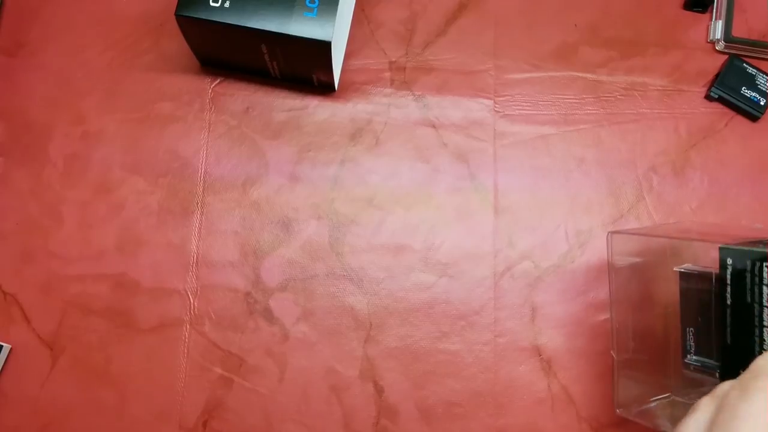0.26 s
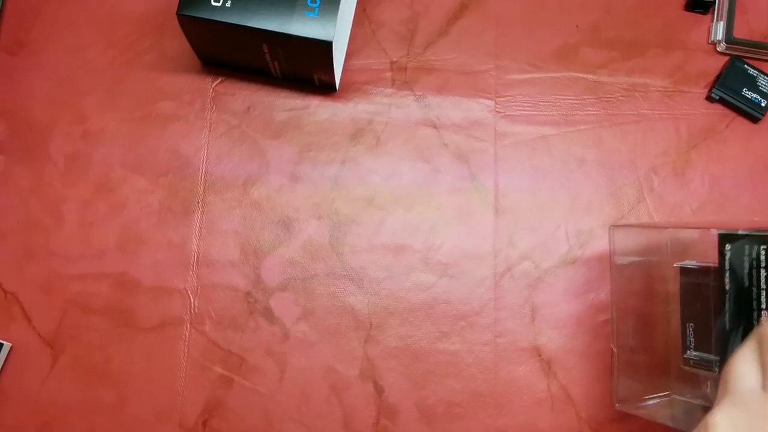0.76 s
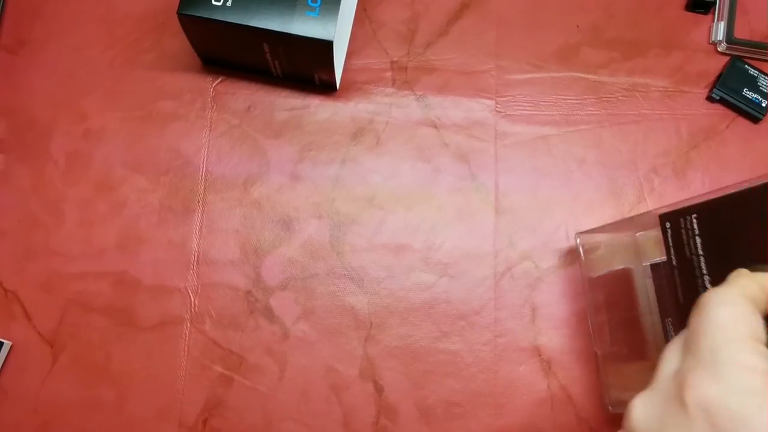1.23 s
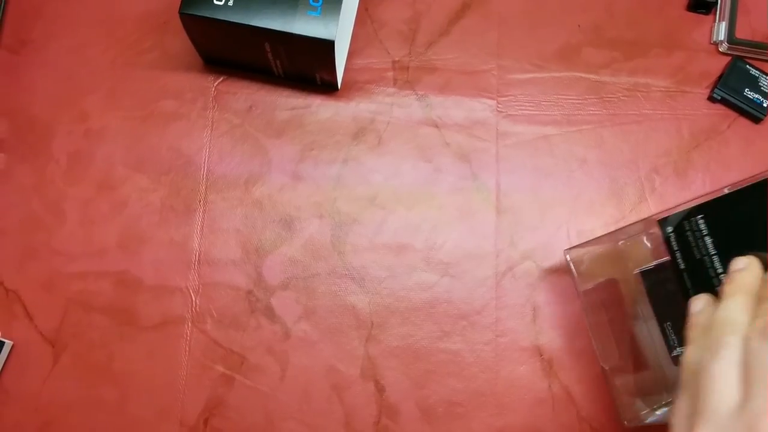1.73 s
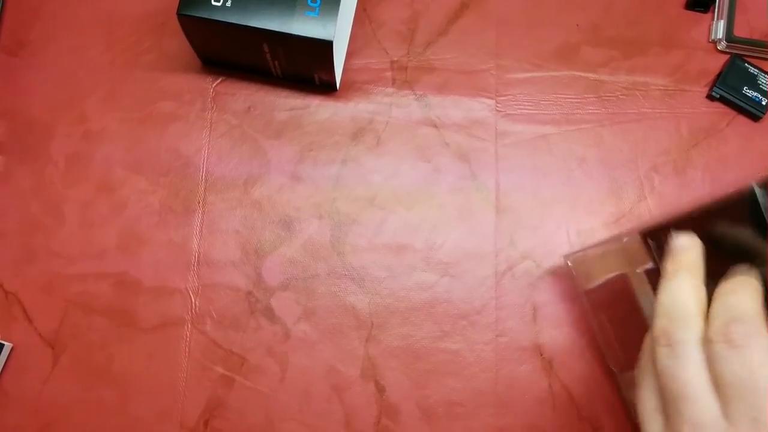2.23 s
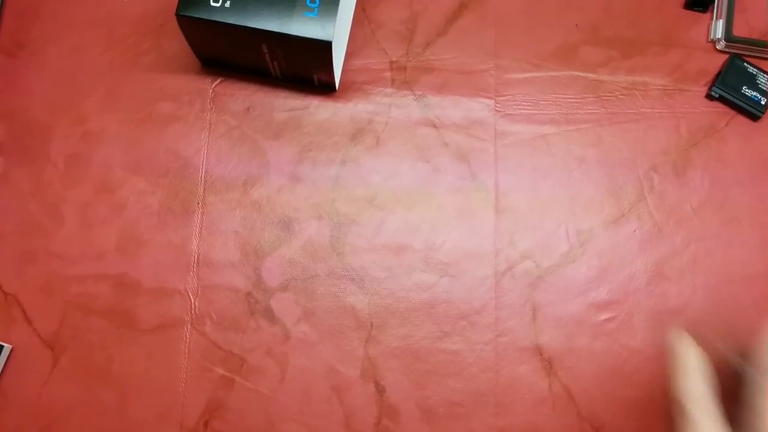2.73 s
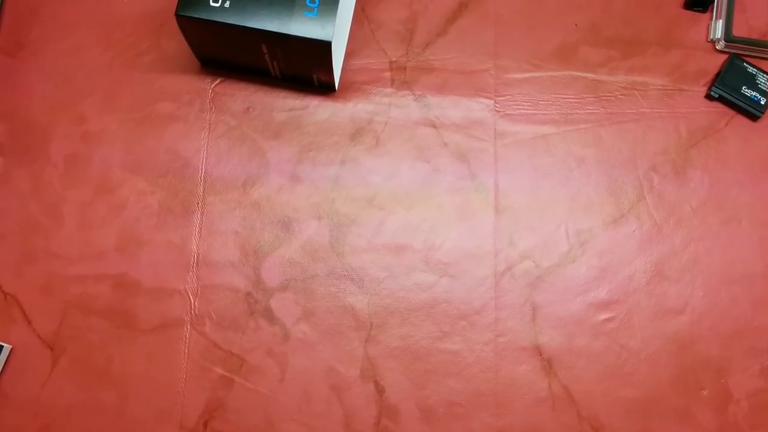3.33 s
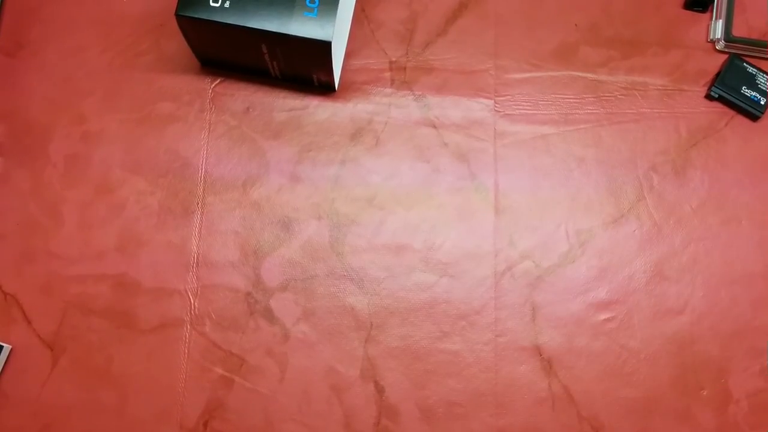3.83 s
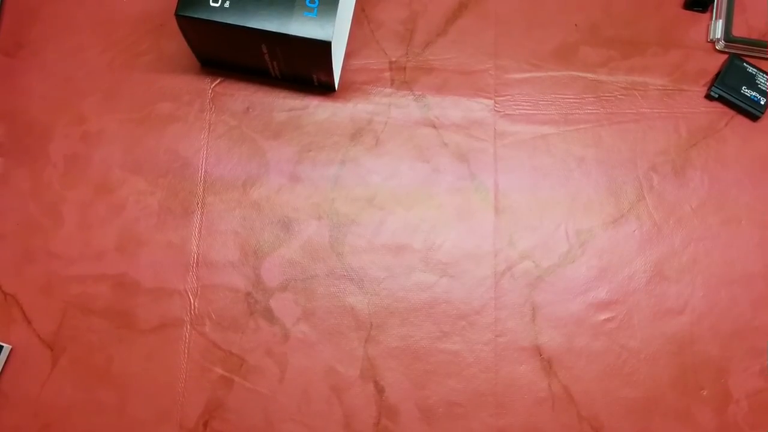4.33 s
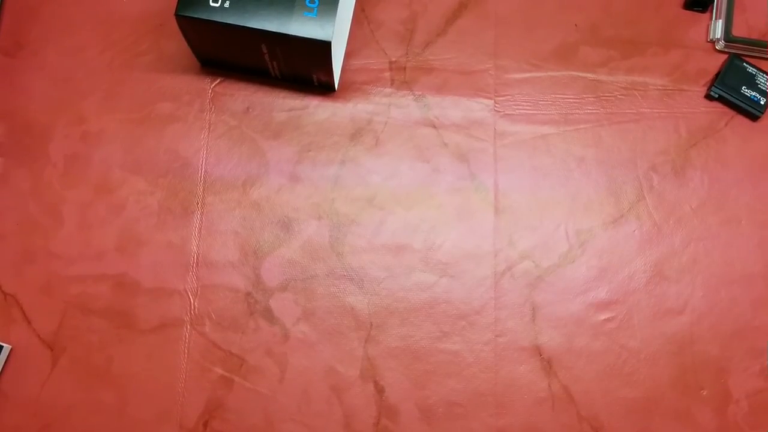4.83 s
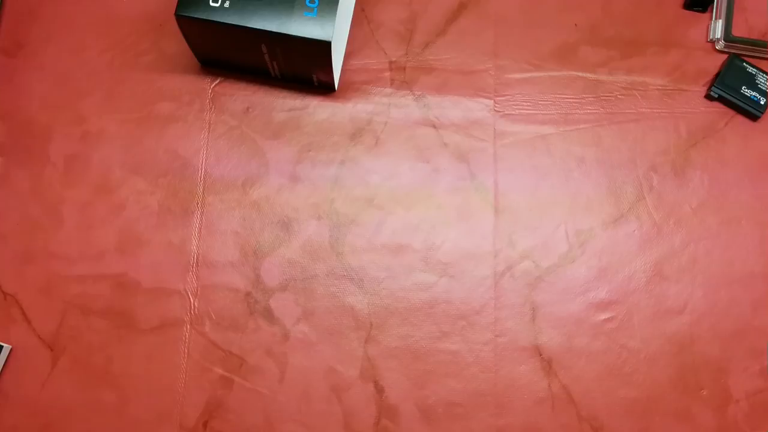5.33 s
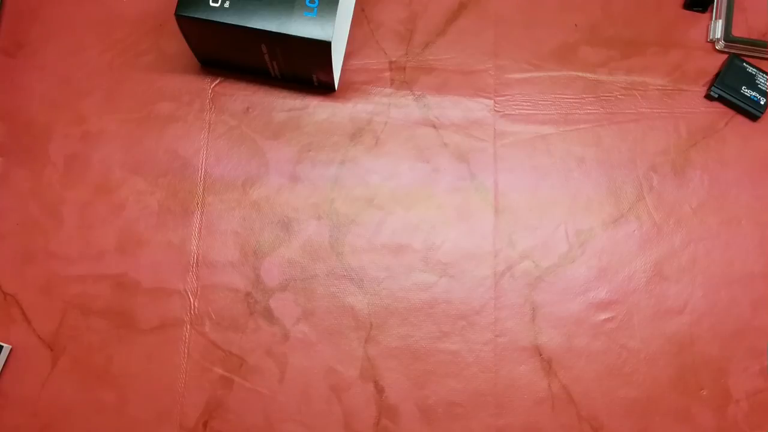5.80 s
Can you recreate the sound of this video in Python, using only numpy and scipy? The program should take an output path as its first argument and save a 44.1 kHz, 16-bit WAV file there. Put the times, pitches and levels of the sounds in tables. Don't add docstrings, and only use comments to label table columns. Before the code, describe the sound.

A stiff clear plastic box is handled on a table, a dull knock and small crackles building to a loud splintering snap, then scattered clicks and rustle.

```python
import sys
import numpy as np
from scipy import signal
from scipy.fft import rfft, irfft
from scipy.io import wavfile
from scipy.ndimage import uniform_filter1d

SR = 44100
rng = np.random.default_rng(int(sys.argv[2]) if len(sys.argv) > 2 else 0)


def put_to_file(sound):
    columns = np.atleast_2d(sound).T
    safe = np.clip(columns, -1, 1)
    whole_steps = np.round(safe * 32767)
    wavfile.write(sys.argv[1], SR, whole_steps.astype(np.int16))


def undo_db(level):
    steps = np.asarray(level, float) / 20
    return 10 ** steps


N = 267201

# (frequency [Hz], level [dB])
HISS_COLOUR = [(18, -14.5), (30, -4.5), (50, -13), (167, -16.5), (399, -11.5), (858, -12), (1210, -16),
               (1570, -17), (9000, -20.5), (15700, -28), (15950, -61.5)]
# (time [s], effort [dB], nail scratch [dB])
FINGER_EFFORT = [(0.0, -76.5, 12), (0.4, -81.5, 8), (0.64, -68.5, -8), (1.27, -73.5, -4), (2.39, -67, 7.5),
                 (2.772, -79.5, -3), (3.46, -61, -3), (4.02, -75.5, -11.5), (4.539, -64, -9),
                 (4.691, -46.5, -6), (4.86, -61.5, -4), (5.11, -72.5, 0), (5.21, -70.5, -15),
                 (5.52, -59.5, -8), (5.63, -70, 4), (5.859, -73.5, 9), (5.99, -58, 4), (6.06, -43, -14)]
# (time [s], peak [dB], pitch [Hz])
KNOCKS_AND_BUMPS = [(0.037, -35, 89.3), (0.478, -37, 95), (0.763, -57, 109), (0.895, -48, 103),
                    (0.929, -48, 92), (1.001, -49, 106), (1.336, -63.5, 80), (1.487, -18.5, 116),
                    (1.558, -36.5, 131), (1.677, -43.5, 94), (1.778, -43, 108), (1.95, -40.5, 117),
                    (1.989, -37, 126), (2.04, -41, 101), (2.26, -39, 88.5), (2.309, -43.5, 129),
                    (2.373, -44, 148), (2.421, -45.5, 111), (2.554, -44, 134), (2.675, -51, 123),
                    (3.437, -47, 115), (4.265, -45, 167), (4.595, -23.5, 125), (5.038, -41.5, 107.5),
                    (5.236, -36.5, 124.3), (5.319, -37.5, 114), (5.668, -57, 119), (5.831, -37.5, 131),
                    (6.019, -35.5, 122),
                    (0.042, -48, 250), (1.01, -63, 200), (1.493, -34.5, 290), (1.554, -41.5, 140),
              (1.823, -47, 150), (2.073, -43, 130), (2.3, -46.5, 230), (2.684, -51, 270),
              (4.658, -33.5, 100), (5.285, -40.5, 140), (5.39, -49, 130), (5.885, -42, 200),
              (5.959, -49, 200)]
# (peak time [s], peak [dB], pitch [Hz], t60 [s])
FINGER_DRAGS = [(0.429, -64, 964, .4), (0.43, -70, 3330, 0.16), (0.545, -67, 2700, 0.23),
                (0.565, -65, 966, 0.17), (0.587, -70, 3420, .08), (0.59, -75, 4900, 0.074),
                (0.622, -61, 1700, 0.12), (0.664, -69.5, 1720, 0.16), (0.756, -67, 1470, 0.049),
                (0.756, -68, 3230, .06), (0.89, -65, 1120, 0.054), (0.933, -68, 1900, .06),
                (1.01, -63, 1750, 0.16), (1.08, -69, 2180, .06), (1.082, -62.5, 2790, 0.04),
                (1.186, -71, 1810, .05), (1.249, -60, 2730, 0.076), (1.262, -71, 5200, .15),
                (1.309, -62.5, 590, 0.073), (1.339, -72, 1450, 0.082), (1.9, -70.5, 1970, 0.13),
                (2.748, -70, 1498, .1), (2.756, -73, 1960, 0.11), (2.788, -69, 1380, 0.095),
                (3.047, -64, 850, 0.068), (3.277, -66, 3360, .1), (3.386, -63, 3074, 0.096),
                (3.705, -71.5, 2700, 0.17), (3.715, -71, 1810, 0.19), (3.803, -67.5, 970, 0.13),
                (5.48, -73, 1890, 0.1)]
# (peak time [s], peak [dB], pitch [Hz], t60 [s])
SINGING_PANELS = [(0.1, -45.5, 3560, .03), (0.484, -50.5, 3400, 0.083), (0.484, -44, 1033, 0.036),
                  (0.482, -51.5, 1675, .04), (1.498, -49, 910, 0.044), (1.573, -47.5, 1415, 0.013),
                  (2.033, -37, 7600, 0.033), (2.185, -56, 3730, 0.027), (2.311, -51.5, 3700, 0.035),
                  (2.376, -45, 1310, 0.068), (2.427, -33, 1070, 0.016), (2.682, -62, 2090, .04),
                  (3.179, -31.5, 7010, .02), (3.566, -61, 2930, 0.028), (3.568, -59, 4640, .04),
                  (3.704, -68, 8010, .04), (3.724, -57.5, 3550, 0.036), (3.871, -43, 1820, 0.041),
                  (3.873, -42.5, 4540, 0.023), (3.968, -19.5, 2556, 0.027), (4.189, -30, 3210, 0.097),
                  (4.208, -35, 3300, 0.05), (3.99, -35, 3220, 0.044), (4.49, -29, 2900, .03),
                  (4.6, -10, 3436, 0.018), (4.603, -17.5, 1324, 0.04), (4.606, -18, 4300, 0.048),
                  (4.641, -24, 1520, 0.038), (4.789, -38, 4970, 0.048), (4.823, -46, 4270, 0.037),
                  (4.877, -46, 2520, 0.026), (5.239, -28.5, 2950, 0.041), (5.286, -17.5, 807, 0.042),
                  (5.286, -23, 2350, .05), (5.3, -27.5, 806, 0.036), (5.326, -42, 3170, .03),
                  (5.338, -33, 3520, .04), (5.434, -59, 3450, .04), (5.545, -52, 4840, 0.061),
                  (5.64, -64, 4330, 0.054), (5.675, -37.5, 1946, 0.037), (5.757, -61, 2080, 0.031),
                  (5.757, -62.5, 3530, 0.034), (5.863, -35.5, 3950, 0.056), (5.893, -25.5, 4220, 0.038),
                  (5.965, -41, 4540, 0.033), (5.978, -34.5, 5400, 0.043), (6.02, -32.5, 2200, 0.055),
                  (6.02, -47, 5340, .03), (1.819, -41, 1520, 0.029)]
# (peak time [s], peak [dB], centre [Hz], t60 [s])
SEAM_SPLINTERS = [(1.256, -68, 6500, .1), (1.485, -75.5, 3000, .05), (1.822, -65.5, 8400, .3),
                  (2.26, -42.5, 4600, 0.047), (2.362, -51, 2762, 0.07), (2.312, -51, 3500, 0.036),
                  (3.944, -35.5, 2800, .1), (3.945, -54, 6770, .06), (3.9672, -23.5, 3900, 0.0088),
                  (3.989, -26.5, 3400, .012), (4.232, -24.5, 5200, 0.011), (4.262, -40, 12500, 0.041),
                  (4.488, -31.5, 1610, 0.029), (4.638, -15.5, 2500, 0.024), (4.638, -31, 11500, .15),
                  (4.69, -43.5, 12470, 0.19), (5.237, -39.5, 5200, 0.037), (5.266, -56, 7050, .04),
                  (5.284, -43.5, 5000, 0.055), (5.303, -43, 6640, .05), (5.325, -30.5, 3290, .03),
                  (5.353, -44, 5460, 0.031), (3.525, -36, 3020, .02), (5.544, -50, 5130, 0.02),
                  (5.603, -49.5, 2800, 0.063), (5.855, -50, 9000, 0.035), (5.883, -28, 6500, 0.045)]
# (frequency [Hz], level [dB], t60 [s])
BOX_MODES = [(253, -9.5, 0.85), (300, -5, 0.13), (338, 5, 0.038), (358, 4, 0.045), (410, -3.5, 0.048),
             (528.2, -2, 0.062), (621, -2, 0.049), (700, -4.5, 0.0025), (771, -7, 0.064), (865.3, -5, 0.11)]
# (peak time [s], peak [dB], centre [Hz], t60 [s])
BOX_BOOMS = [(0.041, -44, 480, 0.2), (0.101, -47, 690, 0.16), (0.488, -37, 510, 0.033),
             (0.93, -48.5, 443, 0.15), (1.013, -42.5, 327, 0.15), (1.494, -32, 360, 0.094),
             (1.568, -36.5, 506, 0.018), (1.669, -24.5, 610, 0.14), (1.82, -30.5, 650, 0.059),
             (1.961, -37, 630, 0.16), (1.999, -36, 600, 0.5), (2.038, -25, 600, 0.048),
             (2.065, -37.5, 570, 0.11), (2.184, -40.5, 740, 0.052), (2.267, -24, 500, 0.068),
             (2.321, -38.5, 360, 0.016), (2.378, -36.5, 425, 0.1), (2.425, -34, 640, 0.12),
             (2.557, -30.5, 527, 0.06), (3.183, -16, 380, 0.062), (3.433, -33, 400, 0.21),
             (3.462, -30.5, 544, 0.15), (3.872, -31.5, 530, 0.08), (3.969, -23, 502, 0.1),
             (4.196, -34, 643, 0.12), (4.234, -25, 595, 0.052), (4.266, -13.5, 493, 0.022),
             (4.492, -27, 680, 0.08), (4.516, -31, 530, 0.072), (4.602, -4.5, 410, 0.085),
              (4.641, -8, 393, 0.13), (4.664, -2.5, 410, 0.071), (4.686, -22, 385, 0.7),
              (4.82, -36, 464, 0.16), (5.04, -16.5, 410, 0.13), (5.101, -18.5, 481, 0.052),
              (5.257, -12.5, 410, 0.15), (5.287, -18, 797, 0.061), (5.299, -17.5, 640, 0.2),
              (5.335, -20.5, 421, 0.14), (5.388, -38.5, 502, 0.094), (5.443, -38, 410, 0.06),
              (5.541, -32, 478, 0.084), (5.565, -34.5, 366, 0.05), (5.613, -34, 348, 0.021),
              (5.682, -35.5, 497, 0.059), (5.838, -27, 517, 0.35), (5.899, -22.5, 394, 0.053),
              (5.986, -35, 700, 0.028), (6.029, -26, 520, 0.12)]
# (frequency [Hz], level [dB])
WALL_COLOUR = [(410, -30.5), (700, 10.5), (989, 1.5), (1300, 1.5), (1890, -0.5), (2830, 2), (4070, -3.5),
               (5000, -27.5), (6500, -63), (11000, -120)]
# (frequency [Hz], level [dB])
CRACK_COLOUR = [(2060, -37), (3500, 8), (4090, 5.5), (9690, -10), (14600, -21), (15900, -19.5),
                (16150, -56)]
# (peak time [s], peak [dB], crack brightness [dB], crackle t60 [s])
SUDDEN_SNAPS = [(0.1, -34.5, 10.5, 0.057), (0.627, -57, -17.5, 0.32), (1.573, -45, -44, 0.015),
                (1.666, -27, -12, 0.18), (1.99, -20.5, 3.5, 0.078), (2.063, -39, -30, 0.041),
                (2.44, -43, -18, 0.099), (2.973, -34, -11, 0.075), (3.181, -18, -5, 0.038),
                (3.526, -28.5, -15, 0.043), (3.704, -59, -3.5, 0.15), (3.723, -54, -8.5, 0.065),
                (3.869, -40.5, -7, 0.095), (3.909, -48, -15.5, 0.27), (3.967, -18, -7.5, 0.09),
                (3.99, -34, -17, 0.26), (4.233, -23.5, -5, 0.071), (4.49, -22, -7.5, 0.045),
                (4.599, -10, 0, 0.14), (4.639, -3, -4.5, 0.085), (4.6587, -1.5, -0.4, .069),
                (4.682, -20, -13.5, 0.76), (4.96, -45.5, -18.5, .19), (5.042, -23, -27, 0.062),
                (5.094, -25.5, -24, 0.086), (5.283, -13.5, -25, 0.08), (5.303, -28.5, -11, 0.22),
                (5.327, -29, -13, 0.12), (5.828, -25.5, 1.5, 0.13), (5.886, -20.5, -9.5, 0.1)]
# (peak time [s], peak [dB], crack brightness [dB], crackle t60 [s])
RUN_UP_POPS = [(0.481, -30.5, -20.5, 0.059), (1.82, -36.5, -47, 0.18), (1.975, -34, -35, 0.1),
               (2.032, -24.5, -2.5, 0.06), (2.184, -40, -24, 0.037), (2.425, -35, -6, 0.066),
               (2.933, -37, -9.5, 0.062), (3.233, -41, -14, 0.043), (3.428, -27, -10, 0.051),
               (3.468, -35.5, -32, 0.22), (4.263, -18, -6, 0.077), (4.301, -37, -20, 0.24),
               (4.48, -36, -12, 0.28), (4.5, -28, -10.5, 0.08), (4.625, -14, -4, 0.095),
               (4.821, -33, -13, 0.096), (4.926, -47.5, -15, .14), (5.034, -30, -34.5, 0.087),
               (5.131, -42.5, -18.5, 0.16), (5.239, -15.5, -29.5, 0.15), (5.253, -24.5, -29, 0.35),
               (5.388, -40.5, -14, 0.06), (5.61, -38.5, -34, 0.051), (5.67, -32.5, -18, 0.076),
               (5.757, -52.5, -19, 0.049), (5.812, -33.5, -20, 0.18), (5.964, -33, -6, 0.15),
               (5.977, -30, -5.5, 0.075)]
# (peak time [s], peak [dB], crack brightness [dB], crackle t60 [s])
SLOW_CREAKS = [(1.497, -42.5, -52, 0.019), (1.681, -22, -10, 0.08), (1.944, -36.5, -30, 0.21),
               (2.265, -31, -6.5, 0.058), (2.309, -35.5, -27, 0.073), (2.373, -31, -22, 0.12),
               (2.556, -40, -27, 0.15), (3.45, -36.5, -23, 0.29), (3.952, -32, -16.5, .2),
               (4.186, -35, -9, 0.2), (4.197, -32.5, -6.5, 0.088), (4.208, -33, -14, 0.053),
               (4.518, -36.5, -12.5, 0.13), (4.788, -28.5, -15, 0.051), (4.877, -35.5, -25, 0.14),
               (5.302, -43.5, -19, 0.14), (5.336, -29.5, -15, 0.15), (5.435, -40.5, -33, 0.053),
               (5.53, -37, -30, 0.072), (5.55, -35.5, -19, 0.11), (5.856, -22.5, -4, 0.085),
               (5.893, -21.5, -1.5, 0.056), (5.934, -35.5, -22, 0.18), (6.018, -29.5, -9, 0.21)]
# (peak time [s], peak [dB], crackle t60 [s])
FINGER_TICKS = [(0.053, -51, 0.038), (0.587, -53.5, 0.2), (0.788, -61, 0.089), (0.89, -64, 0.26),
                (0.932, -55.5, 0.085), (1.006, -61.5, 0.61), (1.08, -58.5, 0.059), (1.249, -51, 0.25),
                (1.556, -45.5, 0.021), (2.219, -45, 0.094), (2.505, -51.5, 0.032), (2.532, -50.5, 0.75),
                (2.677, -49.5, 0.22), (3.046, -58, 0.087), (3.32, -43.5, 0.047), (3.568, -46, 0.22),
                (3.606, -49, 0.039), (3.755, -56, 0.13)]
# (time [s], pitch [Hz])
WALL_STRAIN = [(0.0, 2140), (0.5, 2030), (1.0, 2600), (1.5, 2170), (2.0, 2680), (2.3, 1750), (3.0, 2255),
               (3.7, 3350), (3.95, 3740), (4.2, 3850), (4.3, 2620), (4.5, 3000), (4.66, 2160), (4.85, 2700),
               (5.1, 2170), (5.3, 2700), (5.55, 2240), (6.06, 2540)]

SNAP_MS, POP_MS, CREAK_MS, TICK_MS = 2.9, 7.4, 16.4, 13.4
PANEL_MS, DRAG_MS, SPLINTER_MS = 2.9, 16, 2.5
TICK_BRIGHT_DB = -23
DULL_DB_PER_OCTAVE = 29.5
WALL_TOP_HZ = 3740
SPLINTER_WIDTH = 1.35
ON_WALL_DB, ON_TOP_DB, ON_TABLE_DB = -7, -16.5, -6
LIFT_S, SET_DOWN_S, LIFTED_DB = 3.15, 5.75, -9
HISS_DB = -79.5
HAZE_DB, HAZE_FROM_DB, HAZE_FALL_DB_S = 8.5, -79, 191
GATE_DB, GATE_DEPTH_DB, GATE_TOP_DB = -48, -12.5, -7.5
LIMIT_DB, RELEASE_DB_S = -1.5, 500.5
OFFSET = -.0004
TOP_CUT = signal.cheby2(12, 45, 16050, fs=SR, output="sos")
LEAD, SIZE = SR // 20, SR // 4
BURST_T = (np.arange(SIZE) - LEAD) / SR


def at_hz(points, hz):
    points_hz, points_db = np.transpose(points)
    return np.interp(np.log(hz), np.log(points_hz), points_db)


def ring(clicks, hz, t60):
    r, w = undo_db(-60 / (t60 * SR)), 2 * np.pi * hz / SR
    return signal.lfilter([0, np.sin(w)], [1, -2 * r * np.cos(w), r * r], clicks + 1e-18)


def band(x, low_hz, high_hz):
    return signal.sosfilt(signal.butter(2, [low_hz, high_hz], "band", fs=SR, output="sos"), x)


def colour(x, spectrum):
    hz = np.maximum(np.fft.rfftfreq(len(x), 1 / SR), 1)
    return irfft(rfft(x) * undo_db(at_hz(spectrum, hz)), len(x))


def cracks(size, per_s, spread_db):
    chance = rng.random(size)
    loud = rng.exponential(1, size)
    sign = rng.choice([-1, 1], size)
    return (chance < per_s / SR) * undo_db(spread_db * np.minimum(loud, 4)) * sign


def swell(t, rise, t60):
    return undo_db(np.where(t < 0, 20 * t / rise, -60 * t / t60))


def around(hz, centre_hz, octaves):
    return np.exp(-.5 * (np.log2(hz / centre_hz) / octaves) ** 2)


def top_one(x):
    return x / np.sqrt(2 * uniform_filter1d(x ** 2, 88).max() + 1e-30)


def rms_one(x):
    return x / np.sqrt(np.mean(x ** 2) + 1e-30)


def lay(track, s, sound):
    at = round(s * SR)
    track[at:at + len(sound)] += sound


def smooth_db(x):
    return 10 * np.log10(uniform_filter1d(x ** 2, size=500) + 1e-12)


def hold(level, fall_per_s):
    fall = fall_per_s * np.arange(N) / SR
    return np.maximum.accumulate(level + fall) - fall


def haze(x):
    return np.clip((hold(smooth_db(x), HAZE_FALL_DB_S) - HAZE_FROM_DB) / 25, 0, 1)


def amplifier_hiss(x):
    hiss = undo_db(HISS_DB) * rms_one(colour(rng.standard_normal(N), HISS_COLOUR))
    lift = undo_db(HAZE_DB * haze(band(x, 4500, 12000))) - 1
    return hiss + lift * band(hiss, 5800, 18000)


def room(x):
    t = np.arange(SR // 2) / SR
    low, high = rng.standard_normal((2, len(t))) * (t > .008)
    low_tail = band(low, 250, 6000) * undo_db(-60 * t / .28)
    high_tail = band(high, 3500, 11000) * undo_db(-60 * t / .2)
    tail = low_tail + 0.61 * high_tail
    return signal.fftconvolve(x, tail / np.sqrt(np.sum(tail ** 2)))[:N]


def rustle():
    t, (s, effort_db, scratch_db) = np.arange(N) / SR, np.transpose(FINGER_EFFORT)
    box_db, scratch_db = np.interp(t, s, effort_db), np.interp(t, s, scratch_db)
    wall_db = box_db + ON_WALL_DB + 0.6 * scratch_db
    top_db = box_db + ON_TOP_DB + scratch_db
    lifted = uniform_filter1d(1. * (t > LIFT_S) * (t < SET_DOWN_S), size=4000)
    rumble_db = box_db + ON_TABLE_DB + LIFTED_DB * lifted

    clump = rms_one(band(rng.standard_normal(N), 6.2, 40))
    creaks = cracks(N, per_s=15000, spread_db=6.5) * undo_db(1.4 * np.clip(clump, -3, 3))
    rumble = band(rng.standard_normal(N), 45, 130) * undo_db(3.5 * clump)
    box = band(sum(undo_db(g) * ring(creaks, hz, 0.12 * t60) for hz, g, t60 in BOX_MODES), 250, 770)
    wall = np.zeros(N)
    for hz in (1070, 1280, 1750, 2370, 2700, 3200):
        fade_db = 4.1 * rms_one(band(rng.standard_normal(N), 1.5, 7))
        wall += undo_db(fade_db) * ring(creaks, hz, 28.0 / hz)
    wall = band(band(wall, 960, 5600), 700, 3700)
    top = band(colour(creaks, CRACK_COLOUR), 7400, 16000)
    parts = ((rumble_db, rumble), (box_db, box), (wall_db, wall), (top_db, top))
    return sum(undo_db(db) * rms_one(x) for db, x in parts)


def knocks():
    out = np.zeros(N + SR)
    push = np.zeros(SIZE)
    push[:300] = np.hanning(300)
    jolt = np.gradient(push)
    for s, db, hz in KNOCKS_AND_BUMPS:
        thud = ring(jolt, hz, 0.11)
        thud = thud + 0.092 * ring(jolt, 0.2 * hz, 0.15) + 0.5 * ring(jolt, 1.7 * hz, 0.011)
        lay(out, s, -undo_db(db) * thud / np.abs(thud).max())
    return out[:N]


def panels(rows, rise_ms, cycles):
    out = np.zeros(N + SR)
    for s, db, hz, t60 in rows:
        push = cracks(SIZE, per_s=4100, spread_db=2.5)
        push = push * swell(BURST_T, rise_ms / 1000, np.clip(t60, .008, .5))
        pair = ring(push, 0.97 * hz, cycles / hz) - ring(push, 0.99 * hz, cycles / hz)
        lay(out, s, undo_db(db) * top_one(band(pair, 0.97 * hz, 1.7 * hz)))
    return out[LEAD:LEAD + N]


def splinters():
    out = np.zeros(N + SR)
    for s, db, hz, t60 in SEAM_SPLINTERS:
        burst = cracks(SIZE, per_s=5500, spread_db=4.5)
        burst[LEAD] = 5.5
        burst = burst * swell(BURST_T, SPLINTER_MS / 1000, np.clip(t60, .005, .5))
        low, high = hz / SPLINTER_WIDTH, min(hz * SPLINTER_WIDTH, 15700)
        click = band(band(burst, low, high), low, high)
        lay(out, s, undo_db(db) * top_one(click))
    return out[LEAD:LEAD + N]


def booms():
    out = np.zeros(N + SR)
    for s, db, centre_hz, t60 in BOX_BOOMS:
        rise = 0.0056 * undo_db(-0.4 * max(db + 23, 0))
        push = cracks(SIZE, per_s=3400, spread_db=2.0)
        push = push * swell(BURST_T + 0.0027, rise, 0.81 * np.clip(t60, .01, .4))
        strength, bend = rng.normal(0, 1, (2, len(BOX_MODES)))
        boom = np.zeros(SIZE)
        for (hz, g, mode_t60), a, b in zip(BOX_MODES, strength, bend):
            gain = undo_db(g + 2 * a) * around(hz, 1.155 * centre_hz, 0.48)
            boom += gain * ring(push, hz * (1 + b / 60), mode_t60)
        body = band(band(boom, 270, 980), 150, 1500)
        lay(out, s, undo_db(db) * top_one(body + 0.036 * band(boom, 30, 86)))
    return out[LEAD:LEAD + N]


def buckles():
    ticks = [(s, db, TICK_BRIGHT_DB, t60) for s, db, t60 in FINGER_TICKS]
    kinds = ((SUDDEN_SNAPS, SNAP_MS), (RUN_UP_POPS, POP_MS), (SLOW_CREAKS, CREAK_MS), (ticks, TICK_MS))
    strain_s, strain_hz = np.transpose(WALL_STRAIN)
    out = []
    for rows, rise_ms in kinds:
        for s, db, bright_db, t60 in rows:
            octaves = max(bright_db, -30) / DULL_DB_PER_OCTAVE
            centre_hz = np.interp(s, strain_s, strain_hz) * 2 ** octaves
            out.append((s, db, centre_hz, bright_db, rise_ms, t60))
    return out


def snaps():
    out = np.zeros(N + SR)
    steep = signal.butter(4, WALL_TOP_HZ, fs=SR, output="sos")
    for s, db, centre_hz, bright_db, rise_ms, t60 in buckles():
        rise, t60 = rise_ms / 1000, np.clip(t60, .02, .5)
        burst = cracks(SIZE, per_s=7000, spread_db=3.5)
        burst[LEAD - 30] = min(0.078 / rise, 9.0)

        strength, bend = rng.normal(0, 1, (2, 26))
        pitches = np.geomspace(750, 4700, 26) * (1 + 0.045 * bend)
        gains = undo_db(at_hz(WALL_COLOUR, pitches) + 3.4 * strength)
        gains = gains * around(pitches, centre_hz, 0.75) * np.sqrt(pitches)
        push = burst * swell(BURST_T, rise, 0.82 * t60)
        wall = sum(g * ring(push, hz, 35.0 / hz) for hz, g in zip(pitches, gains))
        wall = band(signal.sosfilt(steep, wall), 520, 7700)

        edge = burst * swell(BURST_T, 0.51 * rise, 0.67 * t60)
        edge = band(colour(edge, CRACK_COLOUR), 3600, 22000)
        top_hz = 5500 + 14000 * undo_db(min(1.3 * bright_db, 0))
        air = 0.18 * band(edge, 5600, 18500)
        edge = band(band(edge, 1500, top_hz), 1200, top_hz) + air
        lay(out, s, undo_db(db) * (top_one(wall) + undo_db(bright_db) * top_one(edge)))
    return out[LEAD:LEAD + N]


def gate(x):
    level_db = smooth_db(x)
    under_db = np.minimum(GATE_DB, hold(level_db, 70) - 14) - level_db
    shut = 1 / (1 + undo_db(-4 * np.clip(under_db, -30, 30)))
    shut = uniform_filter1d(shut, size=200)
    darker = x + (undo_db(GATE_TOP_DB * shut) - 1) * band(x, 2800, 12000)
    return undo_db(GATE_DEPTH_DB * shut) * darker


def limit(x):
    over = np.maximum(20 * np.log10(np.abs(x) + 1e-9) - LIMIT_DB, 0)
    ahead = uniform_filter1d(np.roll(hold(over, RELEASE_DB_S), -40), size=80)
    return x * undo_db(-ahead)


def scene():
    fingers = rustle() + panels(FINGER_DRAGS, DRAG_MS, cycles=32.0)
    box = snaps() + booms()
    trimmed = gate(box + undo_db(-19.5) * room(box) + knocks())
    singing = panels(SINGING_PANELS, PANEL_MS, cycles=26.0)
    return (trimmed + fingers + singing + splinters())[None]


def roll_off(x):
    return signal.sosfilt(signal.butter(12, 17060, fs=SR, output="sos"), x)


def record(dry):
    x = signal.sosfilt(TOP_CUT, dry[0])
    x = signal.sosfilt(signal.butter(2, 35, "high", fs=SR, output="sos"), x)
    x = limit(x)
    hiss = amplifier_hiss(x)
    x = x * np.minimum(np.arange(N)[::-1] / 80, 1)
    return roll_off((x + hiss + OFFSET)[None])


dry = scene()
out = record(dry)
put_to_file(out)
```